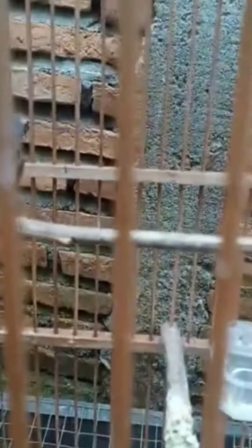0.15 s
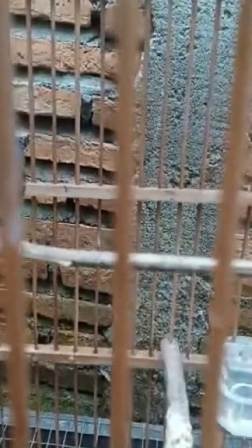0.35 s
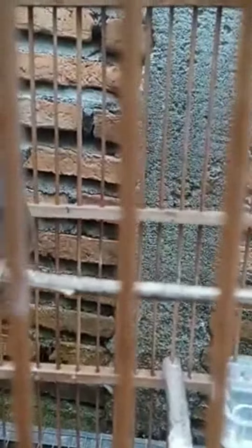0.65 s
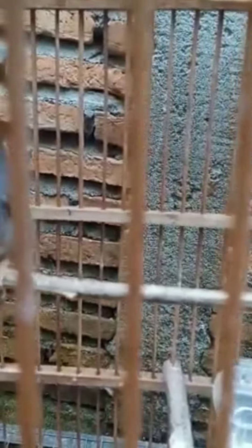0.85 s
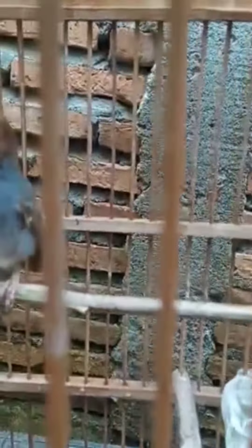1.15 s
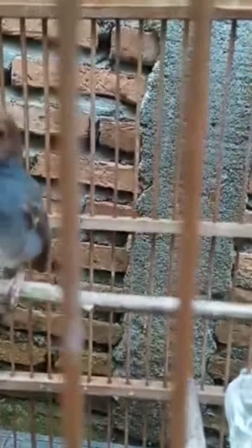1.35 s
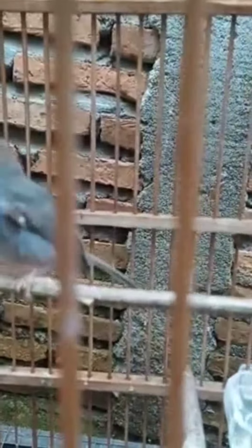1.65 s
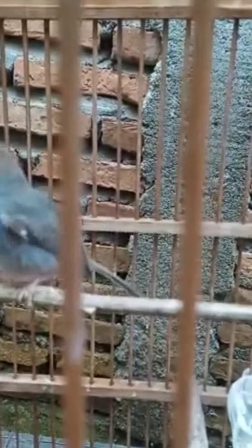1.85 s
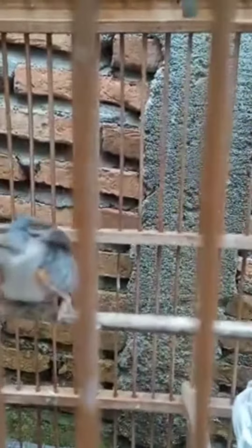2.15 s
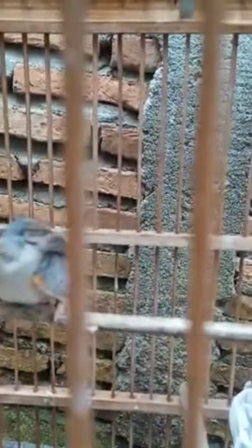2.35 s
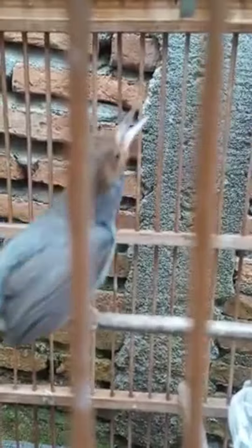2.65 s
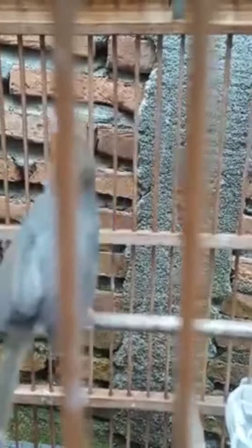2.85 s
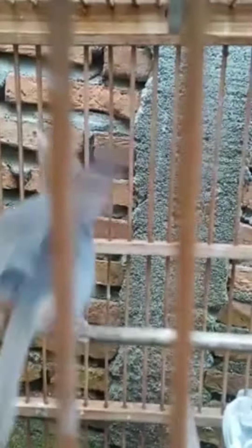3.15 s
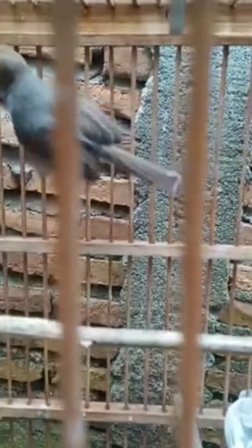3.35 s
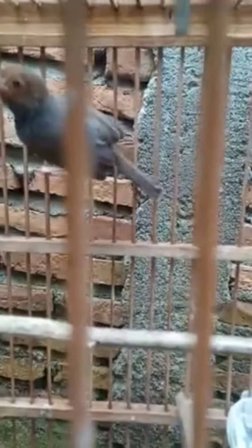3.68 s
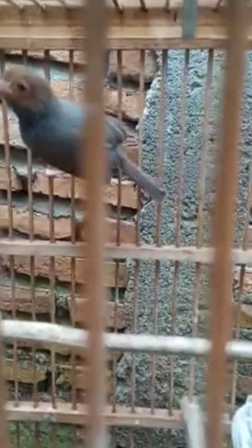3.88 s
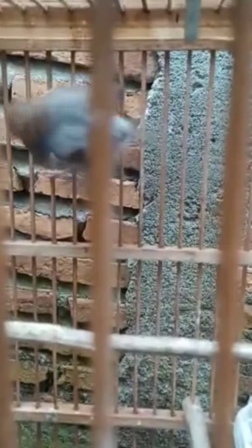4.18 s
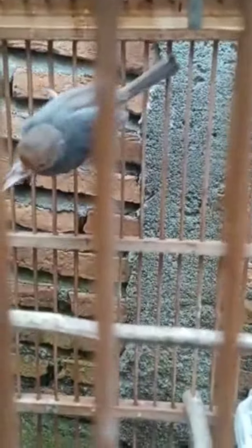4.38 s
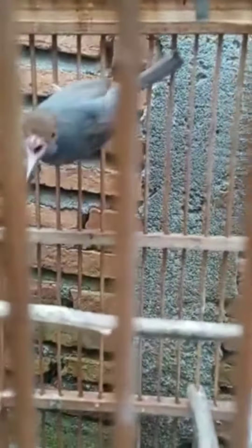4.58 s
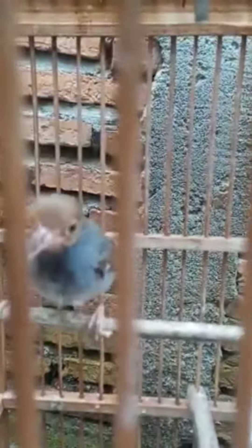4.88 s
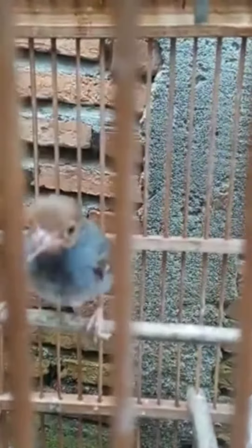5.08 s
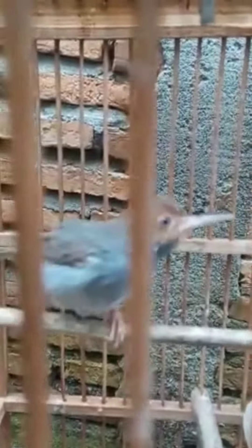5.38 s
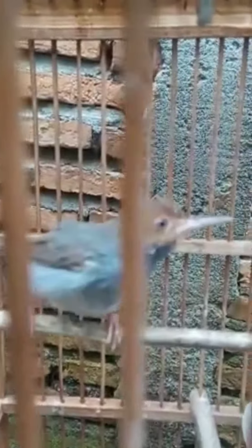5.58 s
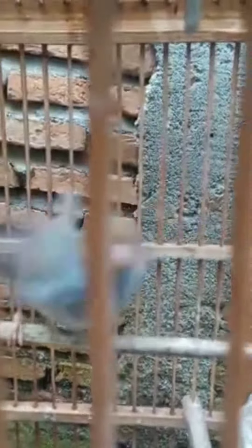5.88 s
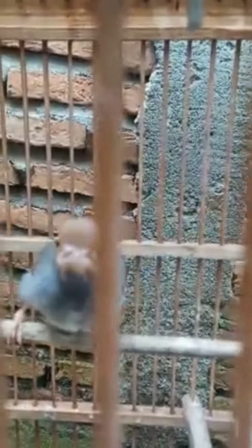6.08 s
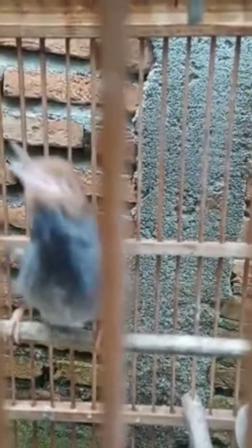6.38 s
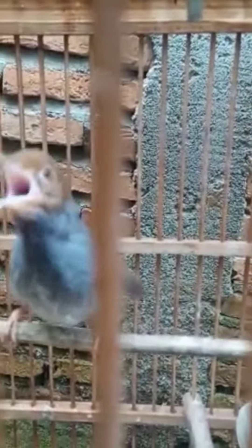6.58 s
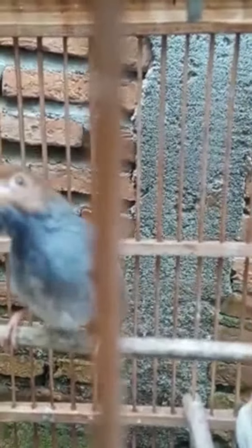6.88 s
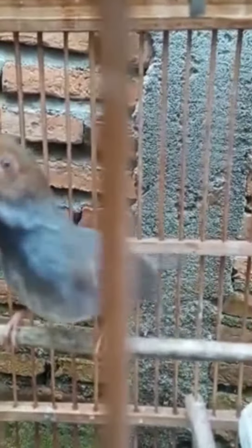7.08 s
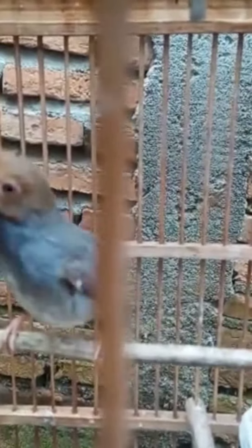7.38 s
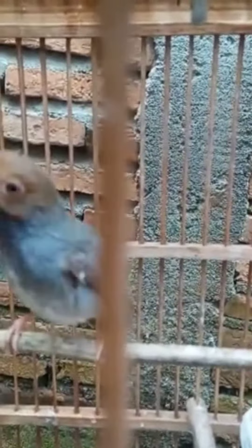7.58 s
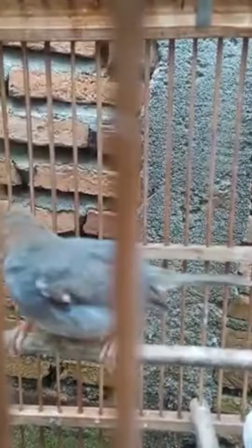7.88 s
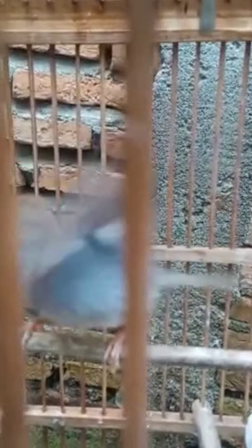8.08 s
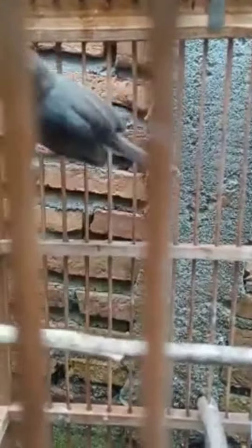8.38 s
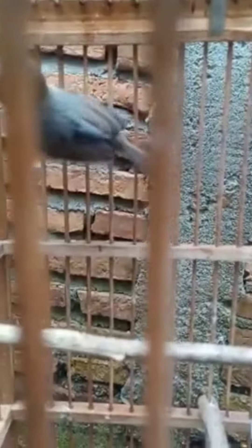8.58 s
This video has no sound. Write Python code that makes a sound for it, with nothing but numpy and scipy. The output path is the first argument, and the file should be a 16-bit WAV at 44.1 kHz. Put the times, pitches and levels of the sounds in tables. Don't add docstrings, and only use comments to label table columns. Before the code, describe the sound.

A small caged songbird sings loud, close bursts of trills, plunging chips and clear whistles, with silences between, in a brick-walled yard.

```python
import sys
import numpy as np
from scipy import signal
from scipy.io import wavfile
from scipy.ndimage import uniform_filter1d

SR = 44100
rng = np.random.default_rng(int(sys.argv[2]) if len(sys.argv) > 2 else 0)


def master(y):
    cut = np.clip(np.atleast_2d(y).T, -1, 1)
    pcm = np.round(cut * 32767)
    wavfile.write(sys.argv[1], SR, pcm.astype(np.int16))


def elevation(decibels):
    levels = np.asarray(decibels, float)
    return 10 ** (levels / 20)


N = 384993
LEAD_S = .1


def songbird():
    # multiple, level/dB
    overtones = [
        [(2, -37.5), (3, -33.5), (4, -45.5), (5, -52), (6, -45.5)],
        [(2, -36.5), (3, -38.5), (4, -49.5)],
        [(2, -35.5), (3, -34.5), (4, -44), (5, -48.5), (6, -50)],
        [(.5, -43), (2, -36), (3, -43.5), (4, -36.5), (5, -42)],
    ]
    # f/Hz, level/dB
    rasp_colour = [(300, -40), (1200, -19), (2500, -4.5), (4500, -3), (8000, -7), (10300, -22),
                   (13500, -11.5), (16000, -22.5)]
    # f/Hz, level/dB
    puff_colour = [(25, -25), (50, -7.5), (90, 5), (250, -2), (500, -8), (900, -13), (1400, -35)]
    drop_push_db = [-1.5, -2.5, 2, -4, 1.5, -0.5, -1, -2.5]
    hoarse_drop, crack = 3, [(1.5, -34)]
    out = np.zeros(N + round(LEAD_S * SR))
    rasp, puff = hiss(rasp_colour, 1.0), hiss(puff_colour, 2.5, size=1024)
    wall = far_wall()
    kinds = [("fall", falls(), -31.0, -56.5), ("pip", pips(), -49.5, -53.0),
             ("drop", drops(), -34.5, -37.5), ("trill", trills(), -35.5, -64.0)]
    for (kind, notes, rasp_db, puff_db), partials in zip(kinds, overtones):
        for k, rows in enumerate(notes):
            is_drop = kind == "drop"
            push_db = puff_db + (drop_push_db[k] if is_drop else 0)
            extra = crack if is_drop and k == hoarse_drop else []
            breath = elevation(rasp_db) * rasp + elevation(push_db) * puff
            s, sound = sing(rows, list(partials) + extra, 0, breath)
            if kind == "trill":
                add(out, s + LEAD_S, twin(s, sound, wall))
            add(out, s + LEAD_S, sound)
    climbs, held = whistles(rasp)
    return out + climbs, held


def falls():
    # time from onset/ms, f/Hz, level/dB
    fall_shape = [(-.5, 4600, -37.5), (0.7, 3705, -8), (3, 3050, 3.5), (4, 2900, -6), (6.5, 2500, -12),
                  (13.5, 2200, -7.5), (16, 2069, -10.5), (22.5, 1950, -25), (23.5, 2300, -37.5)]
    # t/s, level/dB, f/Hz early in the note, length factor
    fall_notes = [
        (0.441, -13, 3057, 0.93),
        (2.5547, -12.5, 3144, 0.93),
        (3.2368, -13, 3066, 0.9),
        (4.393, -12, 3150, 0.97),
        (6.332, -13, 3010, 0.89),
        (8.424, -16, 3117, 0.98),
    ]
    # t/s, f/Hz, level/dB
    link = [(7.013, 3470, -48.5), (7.018, 3750, -25.5), (7.0265, 3740, -19.5), (7.0285, 3390, -11.5),
            (7.0305, 3040, -11.5), (7.035, 2460, -29), (7.04, 2270, -23.5), (7.045, 2203, -21.5),
            (7.0475, 2110, -46)]
    return [placed(fall_shape, 3120, *row) for row in fall_notes] + [link]


def pips():
    # time from onset/ms, f/Hz, level/dB
    pip_shape = [(-0.5, 5300, -26), (1.54, 3950, -4.5), (3, 3850, -1.5), (6.5, 3760, 1.5), (9, 3690, -1.5),
                 (13.5, 3640, -1.8), (17.5, 3570, -5.5), (18, 3520, -12.5), (20.5, 3480, -36.5)]
    # t/s, level/dB, f/Hz, length factor
    pip_notes = [
        (-0.067, -10.5, 3720, 1.001),
        (0.6343, -7, 3708, 0.98),
        (2.7466, -7.5, 3737, 0.96),
        (3.429, -6.5, 3730, 0.81),
        (4.5871, -8.5, 3720, 0.92),
        (6.5359, -7.5, 3743, 0.89),
        (7.2463, -7.5, 3594, 1.06),
        (8.621, -7.5, 3712, 0.89),
    ]
    return [placed(pip_shape, 3720, *row) for row in pip_notes]


def drops():
    # time from onset/ms, f/Hz, level/dB
    ledge = [(-1.16, 5400, -30), (1, 4750, -9.5), (1.34, 4610, 0.54), (4.5, 4490, -2.74),
             (10.5, 4455, -0.04), (15, 4440, -2.5)]
    # time from its loudest point/ms, f/Hz, level/dB
    slide = [(-7, 4420, -8.5), (-3, 4120, -7.5), (-0.47, 3600, 0), (3, 3000, -3), (5.5, 2680, -13.5),
             (9.5, 2420, -19.5), (14, 2280, -16.5), (19.5, 2080, -18.5), (27.5, 1550, -40)]
    # t/s, level/dB, f/Hz, onset to slide/ms, opening held back by/dB
    drop_notes = [
        (-.038, -10, 4511, 20.5, 0.5),
        (.671, -7.5, 4476, 23.4, -4),
        (2.7838, -9, 4474, 20.8, -2.24),
        (3.466, -7, 4495, 21.5, 16),
        (4.6237, -11.5, 4490, 22.9, -3.5),
        (6.5722, -10.5, 4380, 23.0, -4),
        (7.2833, -11.5, 4395, 23.1, -5),
        (8.657, -11, 4390, 21.9, -1.5),
    ]
    # pitch change/Hz, level change/dB
    ledge_ends = [(0, -0.3), (151.5, -2), (80, -0.5), (37, -2), (-74, 3.9), (-150, 5), (-76.5, 5),
                  (-12, 1.5)]
    notes = []
    for (s, db, hz, slide_ms, held_db), (end_hz, end_db) in zip(drop_notes, ledge_ends):
        rows = np.array(list(ledge) + [(ms + slide_ms, f, level) for ms, f, level in slide])
        bend = np.exp(-((rows[:, 0] - slide_ms + 5) / 5) ** 2)
        bent = rows + np.outer(bend, [0, end_hz, end_db])
        notes.append(placed(bent, 4460, s, db, hz, 1, held_db))
    return notes


def trills():
    # time from onset/ms, f/Hz, level/dB
    trill_shape = [(-4.5, 3600, -36), (-1.36, 3820, -12), (5.5, 3940, -5), (8, 3780, -2.5), (9, 3580, -1),
                   (12, 3300, -4), (13.5, 2900, -7.5), (16, 2250, -22.5), (23, 1350, -35)]
    # t/s, level/dB, f/Hz, length factor
    trill_notes = [(0.0325, -17.5, 4224, 0.76), (0.083, -14.5, 4087, 0.77), (0.135, -15, 4080, 0.86),
                   (0.1877, -17.5, 3940, 1.06), (0.2438, -19, 3960, 1.02), (0.2989, -19, 3846, 1.04),
                   (0.3568, -18.5, 3820, 1.02), (0.4137, -17, 3770, 1.03), (2.838, -17.5, 3960, 0.75),
                   (2.8903, -16.5, 3950, 0.87), (2.9438, -18.5, 3850, 0.98), (2.9986, -18, 3910, 0.98),
                   (3.0556, -16.5, 3840, 0.93), (3.115, -17, 3764, 0.85), (6.626, -17.5, 4040, 0.91),
                   (6.6785, -17, 3986, 0.95), (6.732, -17.5, 3944, 0.92), (6.7866, -18, 3883, 1.02),
                   (6.8423, -17.5, 3860, 1), (6.9004, -18.5, 3856, 0.98), (6.9594, -17.5, 3844, 1.0),
                   (8.7265, -22.5, 3989, 0.91)]
    trill_held_db = [-3, -3, -2.5, -1, -1.5, -1.5, -1.5, -1, 0.26, 0, 0.4, 0, 0.2, -0.3, 1.5, 0.5, 0.5,
                     -0.5, -0.5, -1.2, -0.2, -0.3]
    return [placed(trill_shape, 3900, *row, held_db) for row, held_db in zip(trill_notes, trill_held_db)]


def twin(s, sound, wall):
    twin_ms = [1.9, 2.6, 2.9]
    twin_db = [-3.5, -6, -6.5]
    answer_db = [-14.5, -20.5, -19]
    run = int(s > 1) + int(s > 5)
    ms = np.arange(len(sound)) / SR * 1000
    entry = np.clip((ms - 11) / 3 + .5, 0, 1)
    out = elevation(answer_db[run]) * np.convolve(sound, wall)
    add(out, twin_ms[run] / 1000, elevation(twin_db[run]) * sound * entry)
    return out


def far_wall():
    delay_ms, spread_ms = 16, 5.5
    ms = np.arange(1800) / SR * 1000
    sign, chance = rng.standard_normal((2, 1800))
    taps = sign * (chance > 1.6) * np.exp(-((ms - delay_ms) / spread_ms) ** 2 / 2)
    return taps / np.linalg.norm(taps)


def whistles(rasp):
    # time from its top/ms, f/Hz, level/dB
    rise_shape = [(-21.5, 1400, -38.5), (-17.5, 1720, -21.5), (-14, 2050, -14), (-11, 2300, -10.5),
                  (-7.5, 2800, -13), (-5.5, 2730, -6.5), (-2.5, 2840, -1), (0, 2920, 2)]
    # t/s, f/Hz, level/dB
    holds = [
        [(0.494, 2960, -10), (0.5029, 2955, -9.5), (0.5137, 3000, -12.5), (0.5285, 3038, -9.5),
         (0.5452, 3046, -7), (0.5609, 3033, -6), (0.5747, 3003, -9.5), (0.5846, 2954, -13),
         (0.5895, 3020, -18.5)],
        [(2.607, 2988, -10.5), (2.6156, 3023, -14.5), (2.6262, 3053, -14), (2.6405, 2995, -12.5),
         (2.6568, 3017, -6), (2.6721, 3021, -6.5), (2.6855, 2980, -7.5), (2.6951, 2923, -16.5),
         (2.6999, 2976, -20)],
        [(3.29, 2985, -9), (3.2986, 2985, -13), (3.309, 3050, -10.5), (3.3233, 3020, -11.5), (3.3395, 3049, -6),
         (3.3548, 3028, -6), (3.3681, 2983, -7), (3.3776, 2925, -14), (3.3824, 2920, -16)],
        [(4.446, 3000, -9.5), (4.455, 3035, -21), (4.466, 3025, -13.5), (4.481, 3000, -15.5),
         (4.498, 3031, -11), (4.514, 2990, -11.5), (4.528, 2960, -11.5), (4.5379, 2900, -17.5),
         (4.5429, 2938, -16.5)],
        [(6.385, 2933, -9), (6.3946, 3010, -11), (6.4064, 3031, -12.5), (6.4224, 2973, -11),
         (6.4406, 2998, -6.5), (6.4576, 2990, -6), (6.4726, 2934, -9.5), (6.4833, 2957, -10),
         (6.4886, 2915, -17.5)],
        [(7.083, 2930, -13), (7.0936, 2941, -14), (7.1066, 2916, -17.5), (7.1244, 2915, -12.5),
         (7.1445, 2893, -12.5), (7.1634, 2887, -11), (7.1799, 2750, -15.5), (7.1917, 2748, -18),
         (7.1976, 2680, -19.5)],
        [(8.479, 2960, -11.5), (8.4877, 2995, -17), (8.4983, 2980, -15.5), (8.5128, 2997, -13.5),
         (8.5292, 2980, -11), (8.5446, 3012, -8.5), (8.5582, 2993, -9), (8.5678, 2910, -16.5),
         (8.5726, 2856, -18)],
    ]
    bright = [-5.5, -9, -13.5, -1, -4, -0.5, -8]
    rise_lead_ms = [3, 1.8, 1.6, 1.7, 1.8, 3.5, 1.8]
    # multiple, level/dB
    half_tones = [(2, -39), (3, -41), (4, -44), (5, -35), (.5, -54.5), (1.5, -42), (2.5, -54.5),
                  (3.5, -58.5), (4.5, -49.5)]
    climbs, held = np.zeros((2, N + round(LEAD_S * SR)))
    for hold, bright_db, lead_ms in zip(holds, bright, rise_lead_ms):
        s, hz, db = hold[0]
        release = np.add(hold[-1], [.006, 0, -22.5])
        rise = placed(rise_shape, 2960, s - lead_ms / 1000, db, hz, 0.94).tolist()
        rows = rise + list(hold) + [release]
        s, sound = sing(rows, half_tones, bright_db, elevation(-61.5) * rasp, soft=.45)
        s, climb = sing(rows[:len(rise_shape) - 1], airflow=rasp)
        add(climbs, s + LEAD_S, elevation(-24.0) * climb * np.linspace(1, .15, len(climb)))
        add(held, s + LEAD_S, sound)
    return climbs, held


def placed(shape, own_hz, s, db, hz, length, held_db=0):
    ms, shape_hz, level = np.transpose(shape)
    held = held_db * np.clip(1 - ms / 12, 0, 1)
    return np.transpose([s + length * ms / 1000, shape_hz * hz / own_hz, db + level - held])


def sing(rows, partials=(), bright_db=0, airflow=(0,), soft=0.41):
    # f/Hz, level/dB
    shine = [(1000, -0.5), (5000, -3), (7500, 7.5), (9000, 1.5), (10300, -11.5), (12000, -8.5),
             (13500, 6.5), (15500, -2), (17000, -29.5)]
    s, hz, db = np.transpose(rows)
    t = np.arange(s[0], s[-1], 1 / SR)
    hz, db = (uniform_filter1d(np.interp(t, s, c), size=40, mode="nearest") for c in (hz, db))
    turn = 2 * np.pi * (np.cumsum(hz) / SR + rng.random())
    over = 0
    for k, partial_db in partials:
        waver_db = 2.0 * evened(uniform_filter1d(rng.standard_normal(len(t)), size=200))
        over = over + elevation(partial_db + read(shine, k * hz) + waver_db) * np.sin(k * turn)
    noise = np.take(airflow, np.round(t * SR).astype(int) % len(airflow))
    glide = uniform_filter1d(abs(np.gradient(np.log(hz))) * SR, size=200)
    noise = noise * (1 + 0.015 * glide)
    over = over / (1 + 0.012 * glide)
    tone = np.sqrt(2) * (np.sin(turn) + elevation(bright_db + soft * (db.max() - db)) * over) + noise
    return s[0], elevation(db) * tone * signal.windows.tukey(len(t), min(110 / len(t), 1))


def bill_snaps():
    # t/s, peak level/dB
    snaps = [(2.4661, -38), (2.4797, -23), (2.4937, -25.5), (2.5082, -26.5), (4.2928, -27.5),
             (4.3071, -17.5), (4.3221, -19), (4.3361, -21.5), (8.3067, -27), (8.3228, -24.5),
             (8.337, -23.5), (8.3519, -26.5), (8.3674, -36)]
    # f/Hz, width/Hz, level/dB
    bill = [(2300, 1300, -8.5), (4100, 1400, 0.5), (5600, 1100, 0.5), (7000, 820, 2.5), (13530, 900, -15)]
    return elevation(1.0) * clicks([(s, db, bill) for s, db in snaps], 1.5, 0.0021)


def cage_ticks():
    # t/s, peak level/dB, colour f/Hz
    tick_rows = [(1.2994, -48.5, 3080), (1.8894, -49.5, 3630), (1.908, -57.5, 10780), (2.1246, -51.5, 7340),
                 (2.128, -48, 1495), (2.9415, -34, 6100), (2.271, -53.5, 11870), (2.4424, -49, 6560),
                 (.675, -19, 9016), (3.4297, -21.5, 8870), (3.4642, -21, 5980), (3.4655, -26, 6480),
                 (6.5695, -26, 9000), (7.985, -56, 6030), (4.1494, -58, 6870), (4.1894, -44.5, 7330),
                 (4.2193, -51, 3610), (5.2194, -46.5, 7360), (5.8394, -55, 2940), (6.0798, -48, 7930),
                 (6.1632, -44.5, 3358), (7.72, -51, 6770), (8.1094, -57.5, 3394), (8.1398, -63.5, 7300),
                 (8.1664, -46, 7035), (8.198, -55.5, 3750), (8.2177, -46.5, 3560), (8.2672, -42, 3990)]
    return clicks([(s, db, [(hz, 0.71 * hz, 0)]) for s, db, hz in tick_rows], 0.89, .0015)


def clicks(rows, rattle, rattle_s):
    out, t = np.zeros(N), np.arange(700) / SR
    for s, peak_db, modes in rows:
        burst = rng.standard_normal(700) * rattle * np.exp(-t / rattle_s) + 10 * (t == 0)
        snap = sum(elevation(db) * ring(burst, hz, width) for hz, width, db in modes)
        add(out, s + 0.0016, elevation(peak_db) * snap / abs(snap).max())
    return out


def ring(x, hz, width):
    b, a = signal.iirpeak(min(hz, .4 * SR), max(hz / width, .8), SR)
    return signal.lfilter(b, a, signal.lfilter(b, a, x))


def hops():
    # t/s, peak level/dB
    landings = [
        (1.883, -56),
        (2.191, -47.5),
        (3.16, -55),
        (4.161, -55),
        (5.859, -54.5),
        (8.129, -55.5),
        (8.2, -59.5),
    ]
    # f/Hz, level/dB
    perch = [(90, 3), (300, 0), (700, -13.5), (1500, -13.5), (3500, -15), (5000, -41.5)]
    out, t = np.zeros(N), np.arange(8000) / SR
    wood = hiss(perch, 3.0, size=1024)
    thud = (1 - np.exp(-t / 0.002)) * np.exp(-t / 0.053)
    for s, db in landings:
        add(out, s, elevation(db - 5.5) * wood[round(s * SR):][:8000] * thud)
    return out


def yard(x):
    # delay/ms, level/dB
    echoes = [
        (2.9, -24),
        (5.2, -23),
        (7.7, -25.5),
        (11.5, -29.5),
        (16.3, -30.5),
        (23, -39),
    ]
    space = elevation(-24.0) * tail(4.8, 0.63)
    space[0] = 1
    for ms, db in echoes:
        space[round(ms * SR / 1000)] += elevation(db)
    stir = uniform_filter1d(uniform_filter1d(rng.standard_normal(len(x)), size=300), size=300)
    shimmer = 1 + .2 * evened(stir)
    slow = signal.fftconvolve(x, tail(30.0, 2.3))[:len(x)]
    return signal.fftconvolve(x, space)[:len(x)] + elevation(-35.0) * shimmer * slow


def tail(start_ms, slower):
    # f/Hz, level/dB
    walls = [(1500, -4.5), (2500, 3), (3000, -1), (3600, -4), (4500, -4), (6000, -3.5), (14000, -3)]
    # f/Hz, t60/s
    decay = [(500, .2), (2000, 0.24), (3500, 0.31), (5000, 0.29), (8000, 0.23), (14000, 0.32)]
    taps, at = np.zeros(SR), np.arange(0, SR - 20, 20)
    taps[at + rng.integers(0, 20, len(at))] = rng.choice([-1., 1.], len(at))
    taps *= np.clip(np.arange(SR) / SR * 1000 / start_ms - 1, 0, 1)
    hz, t, z = signal.stft(taps, SR, nperseg=256)
    fade_db = 60 * t / (slower * read(decay, hz))[:, None]
    out = signal.istft(z * elevation(read(walls, hz)[:, None] - fade_db), SR, nperseg=256)[1]
    return out / np.linalg.norm(out)


def far_birds():
    # t/s, length/s, from f/Hz, to f/Hz, level/dB
    hooks = [(.91, 0.048, 7470, 6900, -61), (1.0, 0.112, 5600, 5480, -69), (1.58, 0.098, 7540, 6900, -65.5),
             (2.035, 0.032, 7470, 6801, -48), (2.06, 0.037, 6157, 5840, -61.5),
             (2.09, 0.056, 7780, 6600, -63), (2.28, 0.064, 7790, 6541, -64),
             (5.088, 0.012, 6820, 6680, -55.5), (5.12, 0.062, 6220, 6100, -66.5),
             (5.23, 0.052, 7400, 6656, -64), (5.36, 0.021, 6280, 4525, -62), (5.46, 0.073, 7760, 6819, -64),
             (5.885, 0.027, 7370, 6560, -48), (7.575, .06, 6120, 4895, -63),
             (7.966, .02, 6750, 6510, -58.5)]
    # t/s, length/s, from f/Hz, to f/Hz, level/dB
    glides = [(.85, .09, 4950, 6300, -71), (.93, 0.085, 4800, 5600, -63.5), (1.96, .03, 6270, 3400, -64.5),
              (2.05, .03, 5905, 2800, -73), (3.04, 0.19, 4860, 6020, -65), (4.915, 0.06, 8255, 5225, -68.5),
              (5.0, .05, 3537, 4183, -72.5), (5.05, 0.048, 4190, 6010, -65),
              (7.45, 0.079, 4820, 6150, -68.5), (7.45, .06, 6340, 7530, -69),
              (7.53, 0.035, 4900, 6030, -61), (7.62, 0.061, 5600, 6050, -65),
              (7.69, 0.093, 6050, 7850, -62.5), (4.97, 0.052, 6500, 7500, -71),
              (4.99, 0.052, 5200, 5970, -72), (5.148, 0.054, 5930, 4300, -65),
              (1.025, .035, 5250, 3980, -64), (5.1, .012, 6000, 4800, -63.5), (7.75, .1, 7310, 7500, -70)]
    out, u = np.zeros(N), np.linspace(0, 1, num=12)
    arch_db = np.interp(u, [0, .3, 1], [0, 0, -4])
    for rows, bend in ((hooks, 2.9), (glides, .7)):
        for s, length, from_hz, to_hz, db in rows:
            pitch = from_hz + (to_hz - from_hz) * u ** bend
            add(out, *sing(np.transpose([s + length * u, pitch, db + arch_db])))
    flicker = evened(uniform_filter1d(rng.standard_normal(N), size=150) + 0.3)
    out = 0.76 * out * flicker
    return out + elevation(1.0) * signal.fftconvolve(out, tail(2.6, 1.3))[:N]


def rustling():
    # t/s, spread/s, level change/dB
    stirs = [(1.07, 0.07, 17), (1.39, 0.095, 15.5), (1.58, .045, 13), (1.77, .09, 17), (2.22, 0.055, 6.5),
             (2.601, 0.306, 2), (4.22, 0.065, 9), (5.55, 0.23, -12), (5.92, 0.065, 9.5), (6.902, 1, 6),
             (8.318, 0.19, 10)]
    # f/Hz, level/dB per Hz
    rustle_colour = [(530, -42), (900, -14.5), (1150, -17), (3550, -1), (4570, -12), (7340, 2),
                     (10300, -14.5), (13300, -7.5), (16400, -26)]
    return along(-77.5, stirs) * hiss(rustle_colour, 2.2)


def street():
    # t/s, spread/s, level change/dB
    traffic = [
        (1.4, 0.86, 0.1),
        (2.328, 0.19, 3.5),
        (4.0, 0.314, 2.5),
        (4.42, 0.153, 6),
        (5.901, 0.44, -0.5),
        (6.948, 0.34, -7),
    ]
    # f/Hz, level/dB per Hz
    street_colour = [(15, -48.5), (25, -19), (52, 0), (91, 1.5), (253, -7.5), (283, -2.5), (334, -7),
                     (358, -11.5), (700, -15.5), (910, -44), (1540, -120)]
    return along(-70.5, traffic) * hiss(street_colour, 1.5, size=2048)


def open_air():
    # f/Hz, level/dB per Hz
    air_colour = [(320, -33), (550, -6), (752, -6), (2620, -5), (3680, -3.5), (3950, -3.5), (4250, -8.5),
                  (7280, -5.5), (10800, -22.5), (14000, -22.5), (16400, -33.5)]
    return elevation(-69) * hiss(air_colour, 0.9)


def hum():
    # f/Hz, level/dB
    motor_lines = [
        (285, -80),
        (338, -80.5),
    ]
    out, t = np.zeros(N), np.arange(N) / SR
    for hz, db in motor_lines:
        waver_db = 1.9 * evened(uniform_filter1d(rng.standard_normal(N), size=6000))
        out += elevation(db + waver_db) * np.sin(2 * np.pi * hz * t)
    return out


def along(bed_db, swells):
    t = np.arange(N) / SR
    return elevation(bed_db + sum(db * np.exp(-((t - s) / spread) ** 2) for s, spread, db in swells))


def hiss(points, patchy_db, size=512):
    a, b, patches = rng.standard_normal((4 * (N + SR) // size, size // 2 + 1, 3)).T
    patches = uniform_filter1d(patches, size=6, axis=0)
    patches = evened(uniform_filter1d(patches, size=10240 // size, axis=1))
    colour_db = read(points, np.fft.rfftfreq(size, 1 / SR))[:, None]
    z = (a + 1j * b) * elevation(colour_db + patchy_db * patches)
    return evened(signal.istft(z, nperseg=size, noverlap=3 * size // 4)[1][:N])


def evened(x):
    return x / np.sqrt(np.mean(x ** 2) + 1e-20)


def read(points, hz):
    f, value = np.transpose(points)
    return np.interp(np.log(hz + 1), np.log(f + 1), value)


def add(mix, s, sound):
    part = mix[round(s * SR):][:len(sound)]
    part += sound[:len(part)]


def scene():
    near, held = songbird()
    add(near, LEAD_S, bill_snaps() + cage_ticks())
    background = street() + open_air() + hum()
    aimed = .65
    bird = yard(near + (1 - aimed) * held) + aimed * held
    return (bird[-N:] + hops() + far_birds() + rustling() + background)[None]


def top_cut(x):
    return signal.sosfilt(signal.butter(12, 16500, fs=SR, output="sos"), x)


def record(dry):
    shrill = signal.sosfilt(signal.butter(4, 4000, "highpass", fs=SR, output="sos"), dry)
    thump_band = signal.butter(1, [60, 500], "bandpass", fs=SR, output="sos")
    thump = signal.sosfilt(thump_band, uniform_filter1d(shrill ** 2, size=30))
    bass_cut = signal.butter(2, 60, "highpass", fs=SR, output="sos")
    cut = signal.sosfilt(bass_cut, dry + elevation(-20.5) * thump)
    swing = np.pi / 2 * uniform_filter1d(uniform_filter1d(abs(cut), size=44), size=44)
    limited = cut / (1 + (swing / .7) ** 6) ** (1 / 6)
    mix = signal.oaconvolve(limited, signal.firwin(301, 16200, fs=SR)[None], "same")
    return top_cut(mix)


dry = scene()
out = record(dry)
master(out)
```